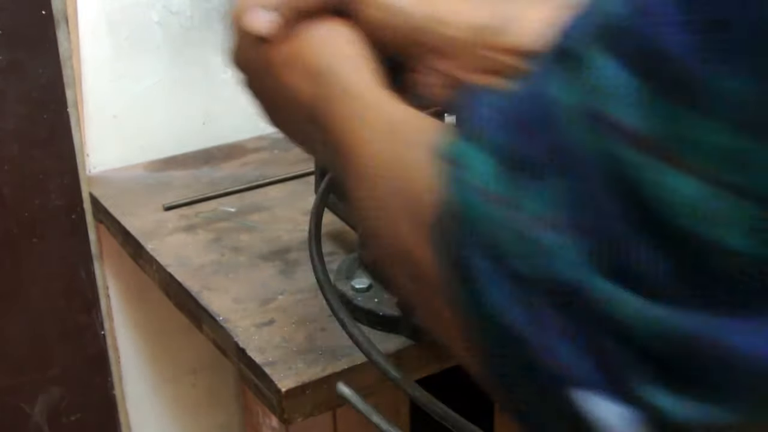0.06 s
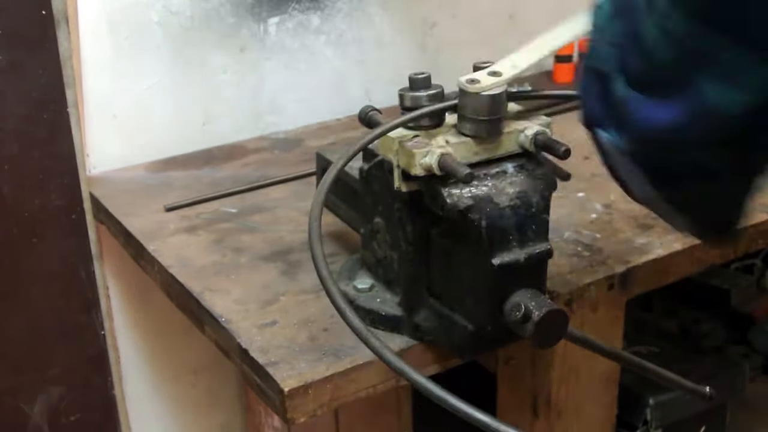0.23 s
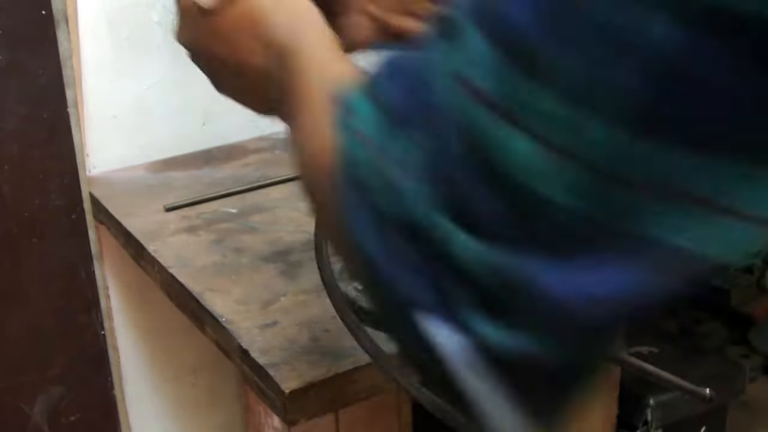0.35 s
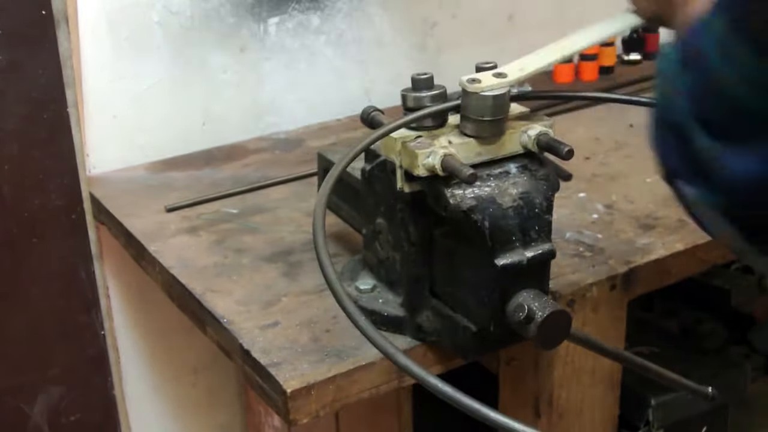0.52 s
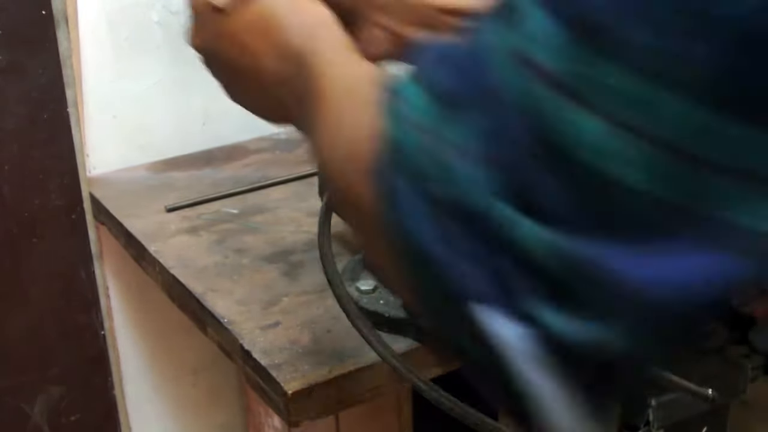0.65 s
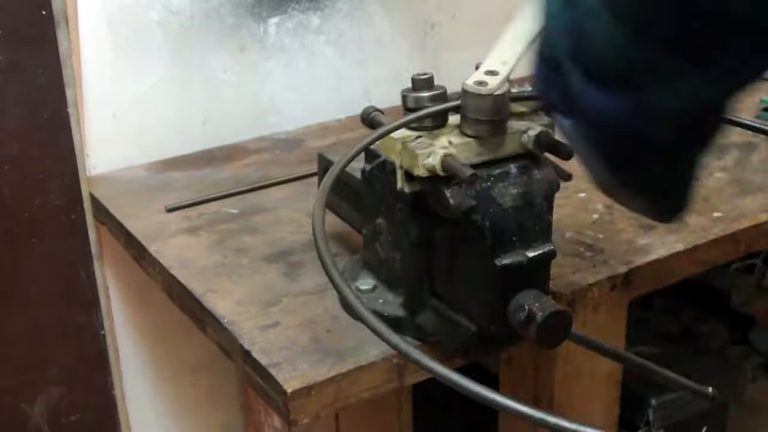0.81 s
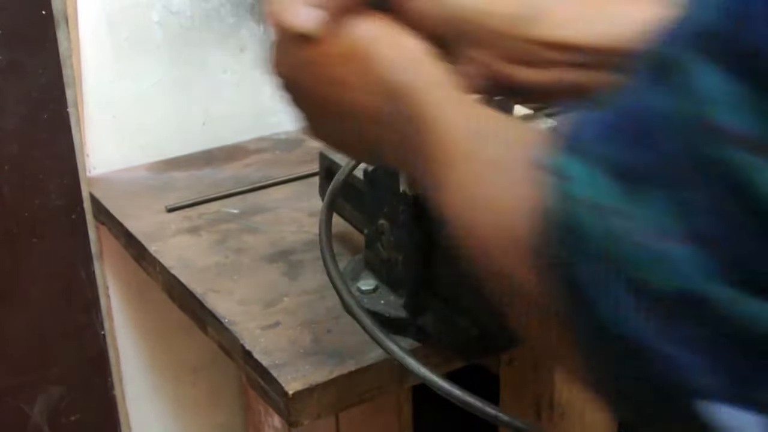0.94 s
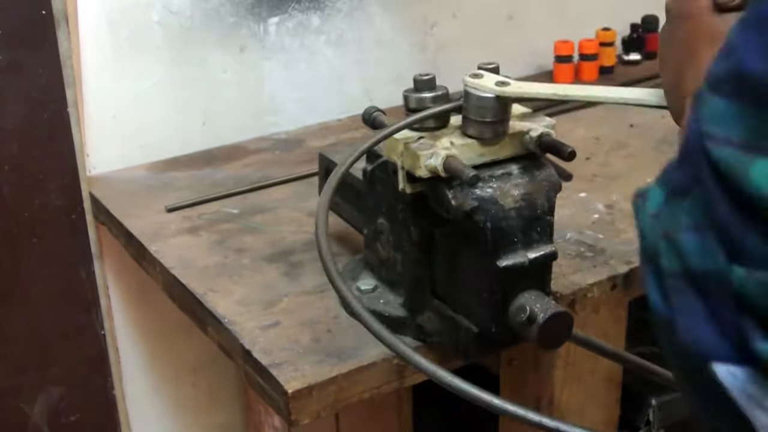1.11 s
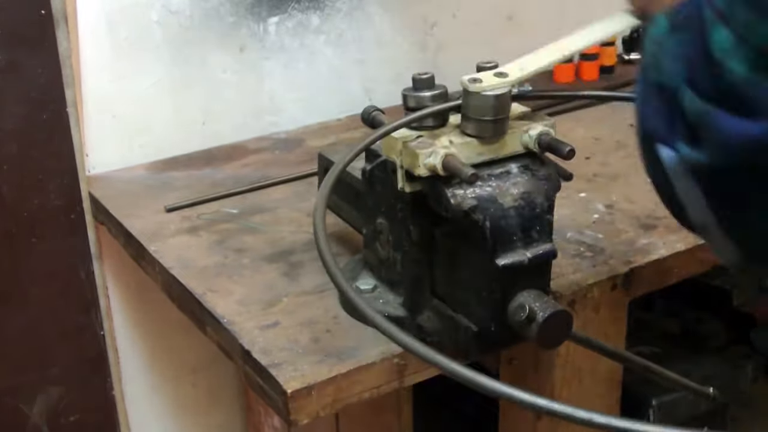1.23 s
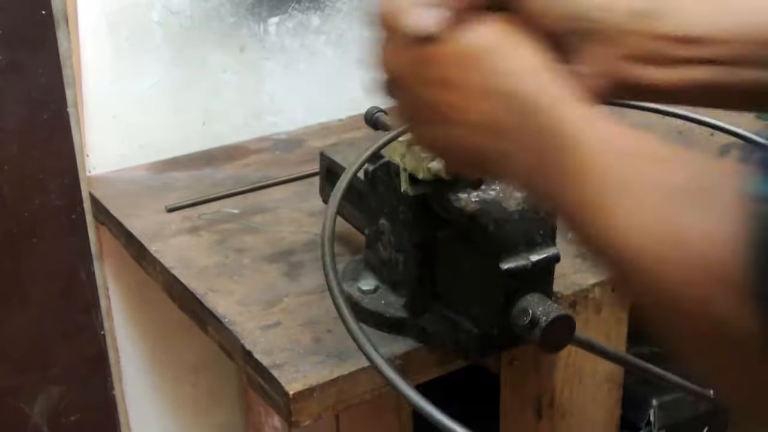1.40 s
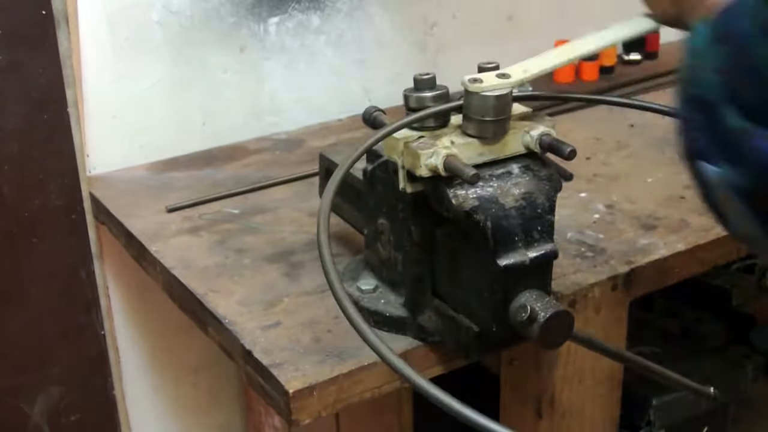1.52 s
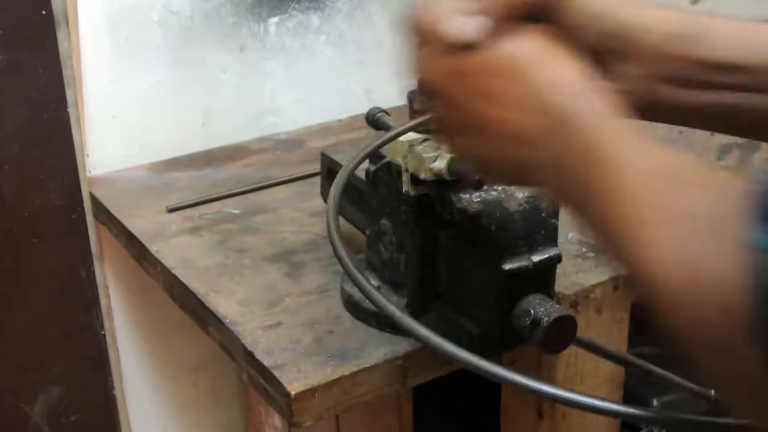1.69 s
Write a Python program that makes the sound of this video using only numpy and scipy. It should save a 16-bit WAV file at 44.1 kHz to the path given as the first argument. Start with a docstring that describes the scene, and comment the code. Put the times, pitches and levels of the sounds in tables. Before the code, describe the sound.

A metal lever clanks once and chatters in its seat on a bending fixture. A steel rod then rubs through the rollers with short scrapes, squeaks and ticks, at arm's length in a small workshop with steady room noise.

```python
"""A small workshop, the stereo microphone at arm's length from a roller fixture in a bench vice.
A steel rod is bent into a hoop with a hand lever, a little right of centre. The lever clanks once
and chatters in its seat; then the rod rubs through the rollers with short scrapes, stick-slip
squeaks and ticks. Behind it lie steady room tone, a low drone and a faint return from the walls."""
import sys
import numpy as np
from scipy import signal
from scipy.fft import rfft, irfft
from scipy.io import wavfile

SR = 44100
rng = np.random.default_rng(int(sys.argv[2]) if len(sys.argv) > 2 else 0)


def transcribe(signal):
    """Save signal, clipped to [-1, 1], as a 16-bit WAV file at the path in sys.argv[1]."""
    frames = np.atleast_2d(signal).T
    limited = np.clip(frames, -1, 1)
    pcm = np.round(limited * 32767).astype(np.int16)
    wavfile.write(sys.argv[1], SR, pcm)


N = 77175
T = np.arange(N) / SR
FREQS = np.maximum(np.arange(N // 2 + 1) * SR / N, 1)
SIDES = np.array([[1], [-1]])  # left, right
CONTACT_WIDTH, TONE_PAN_DB = 0.61, -4  # stereo width of struck noise; left minus right of tones


def amp(db):
    """Decibels to gain."""
    return 10 ** (np.asarray(db) / 20)


def unit(x):
    """Scale to an rms of one."""
    return x / np.sqrt(np.mean(x ** 2))


def along(points):
    """Read (frequency [Hz], value) points at every frequency."""
    hz, value = np.array(points, float).T
    return np.interp(np.log(FREQS), np.log(hz), value)


def shape(x, gain):
    """Filter by a gain at every frequency."""
    return irfft(rfft(x) * gain, N)


def resonance(hz, width):
    """Gain of a resonance that halves at width Hz either side of its peak."""
    return 1 / (1 + ((FREQS - hz) / width) ** 2)


def walk(rate_hz):
    """Smooth random wander with an rms of one."""
    return unit(shape(rng.standard_normal(N), 1 / (1 + (FREQS / rate_hz) ** 4)))


def envelope(start, attack, hold, t60):
    """Rise, hold and die away; all times in seconds."""
    age = T - start
    return np.clip(age / attack, 0, 1) * np.exp(-np.log(1000) * np.maximum(age - attack - hold, 0) / t60)


def noise(gain, width=1):
    """Coloured noise at the stereo microphone, diffuse in the treble and louder on the right."""
    # likeness of the channels, before width and clipping to 0-1: (frequency [Hz], likeness [ratio])
    likeness = [(30, -2), (100, 1.2), (200, 0.35), (600, 0.8), (2000, 0.72), (4500, 0.56), (8000, 0.34),
                (15000, 0.02)]
    # lean of the stereo image: (frequency [Hz], left minus right [dB])
    balance = [(30, -2), (150, -6), (300, -3.5), (600, -5.5), (2000, -2.5), (5000, -2.5), (9000, -3),
               (15000, -2.5)]
    like = np.clip(1 - width * (1 - along(likeness)), 0, 1)
    mid, side = rfft(rng.standard_normal((2, N)))
    pair = mid * np.sqrt(1 + like) + SIDES * side * np.sqrt(1 - like)
    return unit(irfft(pair * amp(SIDES * along(balance) / 2) * gain, N))


def workshop():
    """Behind the bench: steady room tone and a low drone whose resonances swell, mostly late on."""
    # colour of the room tone: (frequency [Hz], relative level [dB])
    room_colour = [(25, -24), (80, -21.5), (140, -20), (220, -10.5), (400, -12), (600, -6), (1000, -5),
                   (2300, -7.5), (3000, -11.5), (4000, -10), (7000, -11.5), (15500, -14.5)]
    # resonances of the drone: (frequency [Hz], half width [Hz], level [dB],
    # swell [dB], middle of the swell [s], its half length [s])
    drone_bands = [(205, 7, -69.5, 11.5, 1.31, 0.12), (304, 41, -72, 5.5, 1.32, 0.32),
                   (543.5, 22.7, -59.5, 6.5, 1.354, 0.18), (480, 26, -73.5, 11, 1.64, 0.73),
                   (805, 22, -69.5, 8, 1.4, 0.48), (946, 21, -69, 2, 0.8, 0.35)]
    drone = 0
    for hz, width, db, swell_db, middle, half in drone_bands:
        swell = np.exp(-((T - middle) / half) ** 2)
        drone = drone + noise(resonance(hz, width)) * amp(db + swell_db * swell)
    return amp(-51) * noise(amp(along(room_colour))) + drone


def walls(direct):
    """The shop's walls send a faint, short reverberation back to the microphone."""
    tail = rng.standard_normal((2, N)) * envelope(start=0.007, attack=0.0041, hold=0, t60=0.17)
    return amp(-22) * signal.fftconvolve(direct, unit(tail) / np.sqrt(N), axes=1)[:, :N]


def rubbing():
    """Grainy friction of the rod in the rollers, rising and falling with the lever strokes."""
    # course of the friction: (time [s], midrange level [dB], treble level [dB])
    strokes = [(0, -52, -57.5), (0.13, -51.5, -50.5), (0.33, -54.5, -48), (0.41, -65, -51), (0.5, -51, -49),
               (0.57, -59, -46), (0.6, -52.5, -53), (0.64, -67, -48.5), (0.69, -55.5, -53),
               (0.76, -51, -51.5), (0.95, -56.5, -48.5), (1.05, -52.5, -51), (1.12, -54, -56),
               (1.16, -58.5, -64), (1.24, -57, -61), (1.286, -53, -47), (1.315, -56, -50),
               (1.45, -53.5, -51.5), (1.55, -50.5, -48.5), (1.66, -55.5, -49), (1.75, -65, -54.5)]
    # colour of the friction: (frequency [Hz], relative level [dB])
    rub_colour = [(400, -5), (700, 0), (950, -5.5), (1250, -4), (1900, -2), (2400, -3.5), (3100, -4.5),
                  (4200, -6.5), (7000, -9), (9000, -10.5), (11500, -13), (15500, -17)]
    # rings of the rod and rollers: (frequency [Hz], relative level [dB], half width [Hz])
    rod_rings = [(1855, -0.5, 150), (2364, 3.5, 100), (3960, 1, 260), (4950, -2.5, 140), (5640, -2.5, 160),
                 (6140, -6, 80), (6960, -1, 170)]
    split_hz, low_cut_hz, flicker_db, grain_db = 3120, 600, 0.9, 0.5
    when, middle_db, treble_db = np.array(strokes).T
    middle_db, treble_db = np.interp(T, when, middle_db), np.interp(T, when, treble_db)
    colour = amp(along(rub_colour)) / np.sqrt(1 + (low_cut_hz / FREQS) ** 8)
    low_share = 1 / (1 + (FREQS / split_hz) ** 6)
    middle = noise(colour * np.sqrt(low_share)) * amp(middle_db - 0.5 + flicker_db * walk(17))
    treble = noise(colour * np.sqrt(1 - low_share)) * amp(treble_db + flicker_db * walk(27))
    rings = noise(sum(amp(db) * resonance(hz, width) for hz, db, width in rod_rings))
    rings = rings * amp(treble_db - 3.5 + 2 * walk(31))  # follow the treble, flickering more
    return (middle + treble) * amp(grain_db * walk(340)) + rings


def squeaks():
    """Short, rough tones where the steel sticks and slips in the rollers."""
    # stick-slip squeaks: (middle [s], pitch [Hz], level [dB], half length [s])
    squeals = [(0.116, 4290, -47, .016), (0.47, 4050, -39.5, 0.0084), (0.488, 3990, -47, 0.028),
               (0.464, 6290, -43.5, 0.021), (0.629, 4900, -52.5, .025), (0.813, 946, -51, .018),
               (0.821, 2700, -53, 0.057), (0.836, 1993, -53, 0.016), (0.889, 1984, -52.5, 0.065),
               (1.188, 3600, -54, 0.028), (1.405, 1110, -54, 0.031), (1.607, 5350, -57, 0.14)]
    wander_hz, roughness = 55, 0.35
    out = 0
    for middle, hz, db, half in squeals:
        swell = np.cos(np.pi / 2 * np.clip((T - middle) / half, -1, 1)) ** 4
        pitch = hz + wander_hz * walk(253)
        tone = np.sqrt(2) * np.sin(2 * np.pi * np.cumsum(pitch) / SR)
        out = out + amp(db) * swell * tone * (1 + roughness * walk(350))
    return out * amp(SIDES * TONE_PAN_DB / 2)


def scrapes():
    """Steel slips on steel in brief, grainy bursts that ring its high resonances."""
    # slips: (start [s], level [dB], rise [s], fall by 60 dB [s])
    slips = [(-0.004, -42.5, 0.0063, 0.26), (0.108, -43, 0.0072, 0.17), (0.288, -43, .01, 0.094),
             (0.421, -28, .017, 0.14), (0.525, -45.5, 0.022, 0.26), (0.617, -45.5, 0.0091, 0.097),
             (0.712, -44, 0.023, .25), (0.98, -37.5, 0.0082, 0.25), (1.03, -52, .015, .15),
             (1.095, -46, 0.014, 0.19), (1.365, -53, .01, 0.13), (1.418, -44, .014, .17),
             (1.585, -47, 0.011, 0.052), (1.625, -47, 0.0089, 0.12)]
    # colour of the sliding hiss: (frequency [Hz], relative level [dB])
    hiss_colour = [(880, -55), (1500, -22), (1590, -23), (1750, -38), (3250, -12), (3760, -13), (4020, -10),
                   (5950, -5), (6130, -3.5), (8710, -4.5), (15500, -6)]
    # high resonances of the steel: (frequency [Hz], level against the hiss [dB], half width [Hz])
    steel_rings = [(6430, -13.5, 35), (8440, -14, 110), (9230, -14.5, 250)]
    push = np.sqrt(sum((amp(db) * envelope(start, rise, 0, fall)) ** 2 for start, db, rise, fall in slips))
    low_cut = FREQS / np.hypot(FREQS, 1200)
    hiss = noise(amp(along(hiss_colour)) * low_cut)
    rings = sum(amp(db) * noise(resonance(hz, width)) for hz, db, width in steel_rings)
    grain = amp(walk(400))  # 1 dB of fast flicker
    return push * unit((hiss + rings) * grain)


def ticks():
    """Hard little contacts: the lever chatters and slack is taken up in the rollers."""
    # metal contacts: (time [s], level [dB], centre [Hz], spread [octaves], fall by 60 dB [s])
    contacts = [(0.1108, -40.5, 5300, 0.91, 0.15), (0.1517, -44, 5560, 1.1, 0.2),
                (0.1886, -39.5, 6000, 1.1, 0.24), (0.2048, -24.5, 5040, 1.1, 0.031),
                (0.2097, -21, 3000, 1.5, 0.011), (0.2167, -24.5, 3450, 1.45, 0.023),
                (0.2212, -39, 2500, 0.93, 0.005), (0.2331, -26.5, 2570, 0.42, 0.012),
                (0.2365, -28, 2400, 0.46, 0.06), (0.3020, -31, 8800, 0.86, .003),
                (1.3190, -33.5, 5000, 0.37, 0.0063), (1.319, -40, 3480, 0.64, 0.065),
                (1.327, -39, 2200, 0.95, 0.037)]
    out = 0
    for start, db, hz, spread, t60 in contacts:
        colour = 1 / (1 + (np.log2(FREQS / hz) / spread) ** 4)
        out = out + amp(db) * noise(colour, CONTACT_WIDTH) * envelope(start, 0.00036, 0, t60)
    return signal.sosfilt(signal.butter(2, 400, "high", fs=SR, output="sos"), out)


def clank():
    """Close to the microphone the lever strikes its seat: modes over a dense ring, damped by the vice."""
    # modes of the fixture with the rod in it: (frequency [Hz], relative level [dB])
    fixture_modes = [(772, -49.5), (1198, -47.5), (1443, -50.5), (1840, -48.5), (2089, -44), (2188, -44),
                     (2293, -38.5), (2380, -41.5), (2436, -43), (2661, -43), (2752, -50), (2826, -46.5),
                     (2929, -46), (3029, -40), (3100, -43), (3212, -39.5), (3380, -48.5), (4199, -46),
                     (4271, -50.5), (4860, -42.5), (5300, -49), (6106, -50), (6760, -49), (7232, -45.5),
                     (7470, -50), (8580, -44.5)]
    # colour of the dense ring: (frequency [Hz], relative level [dB])
    ring_colour = [(60, -38), (200, -27.5), (420, -13.5), (620, -15), (790, -5), (1050, -13), (1450, -11),
                   (1800, -13.5), (2250, -3), (3100, -5), (3700, -16), (4850, -8), (5700, -16.5),
                   (6800, -13), (7700, -27), (9000, -8), (10800, -18.5), (12000, -31), (15500, -35)]
    # damping of modes and ring: (frequency [Hz], fall by 60 dB [s])
    damping = [(100, 0.18), (700, 0.18), (1400, 0.18), (2300, 0.17), (3300, 0.083), (6000, 0.14),
               (11000, 0.067)]

    def ring_out(hz):
        """The ring holds while the lever chatters, then dies away."""
        t60 = np.interp(hz, *np.array(damping).T)
        return envelope(start=0.2044, attack=0.0015, hold=0.014, t60=t60)

    modes_rms = np.sqrt(sum(amp(db) ** 2 for hz, db in fixture_modes) / 2)
    modes = 0
    for hz, db in fixture_modes:
        phase, lead = rng.standard_normal(2)
        channel_phase = SIDES * lead * 0.28 * hz / 4000  # higher modes spread wider
        tone = np.sin(2 * np.pi * (hz * T + phase) + channel_phase)
        modes = modes + amp(db) / modes_rms * ring_out(hz) * tone
    dense = noise(amp(along(ring_colour)), CONTACT_WIDTH)
    ring = 0
    for hz in 35 * 2 ** (np.arange(19) / 2):  # half-octave bands
        band = np.maximum(1 - 2 * abs(np.log2(FREQS / hz)), 0)
        ring = ring + shape(dense, band) * ring_out(hz)
    return amp(-23.5 + SIDES * TONE_PAN_DB / 2) * modes + amp(-25.5) * ring


def scene():
    """The fixture at arm's length from the microphone, the workshop behind it."""
    metal = clank() + ticks() + scrapes() + squeaks()
    return metal + walls(metal) + rubbing() + workshop()


def record(dry):
    """The recorder cuts the top of the microphone's signal steeply."""
    top_hz = 15700
    return signal.sosfilt(signal.ellip(10, 0.2, 80, top_hz, fs=SR, output="sos"), dry)


dry = scene()
out = record(dry)
transcribe(out)
```